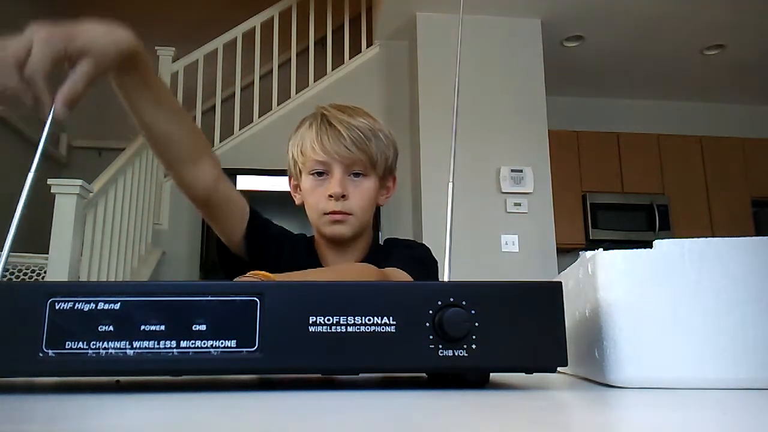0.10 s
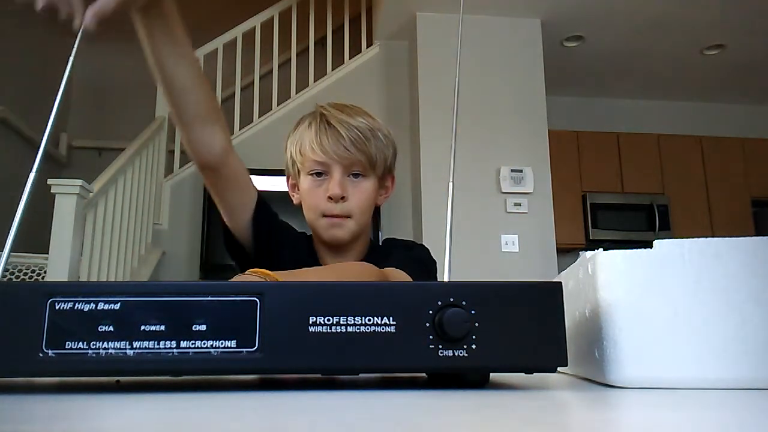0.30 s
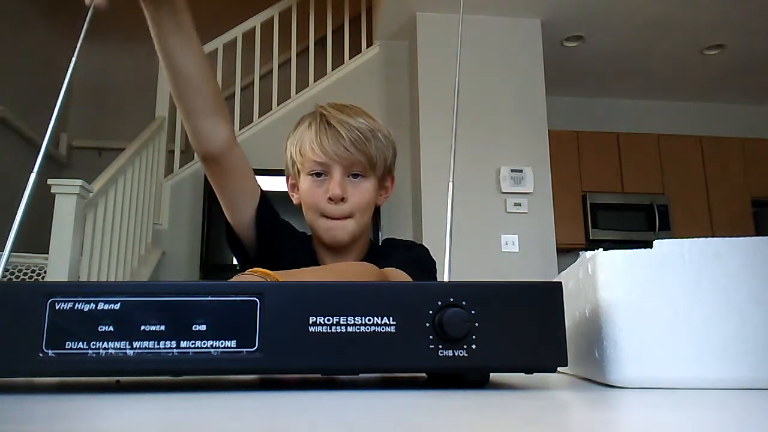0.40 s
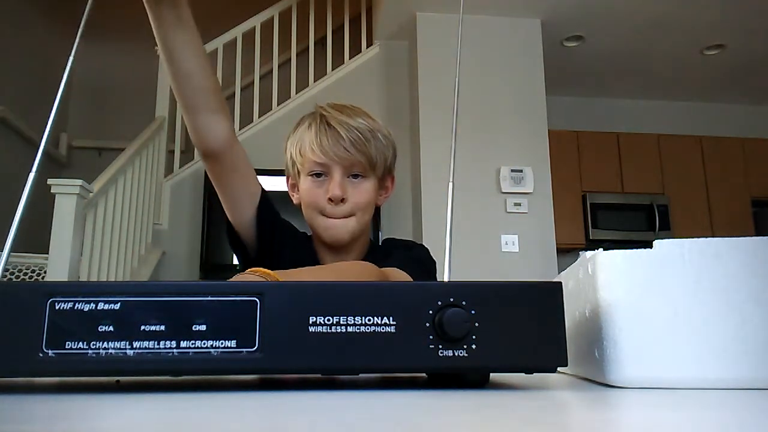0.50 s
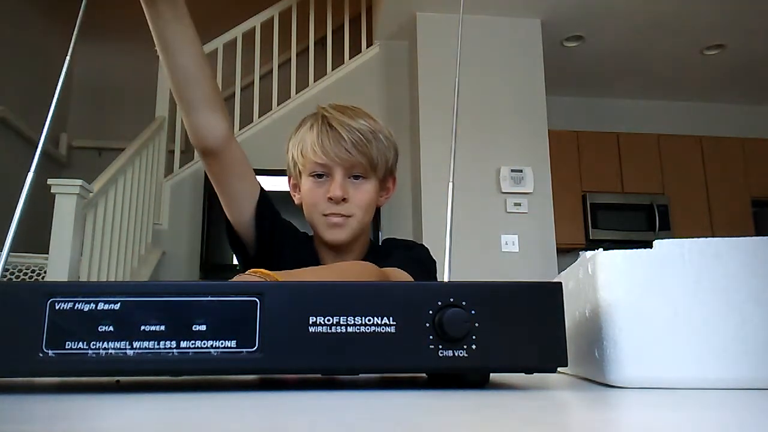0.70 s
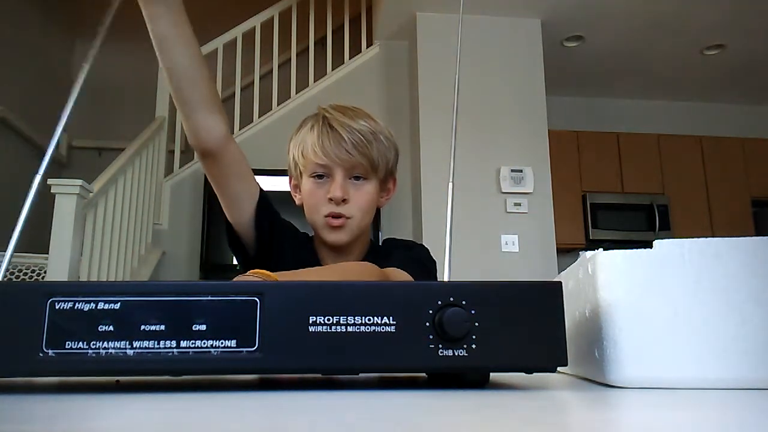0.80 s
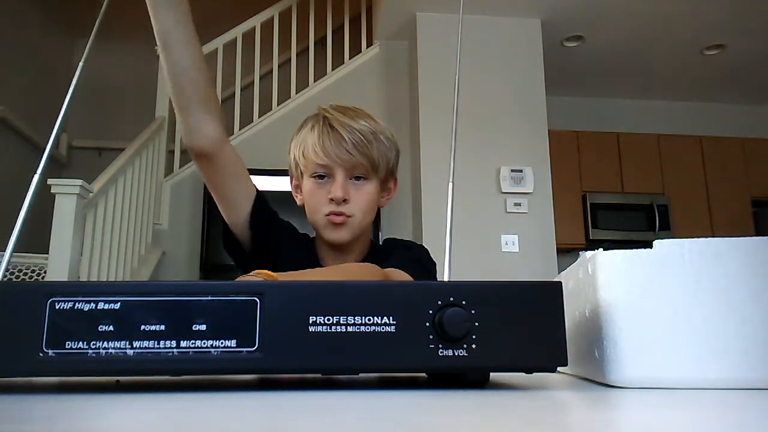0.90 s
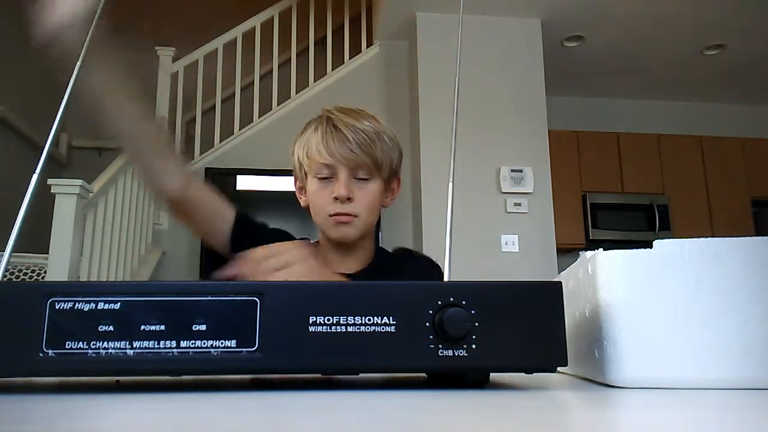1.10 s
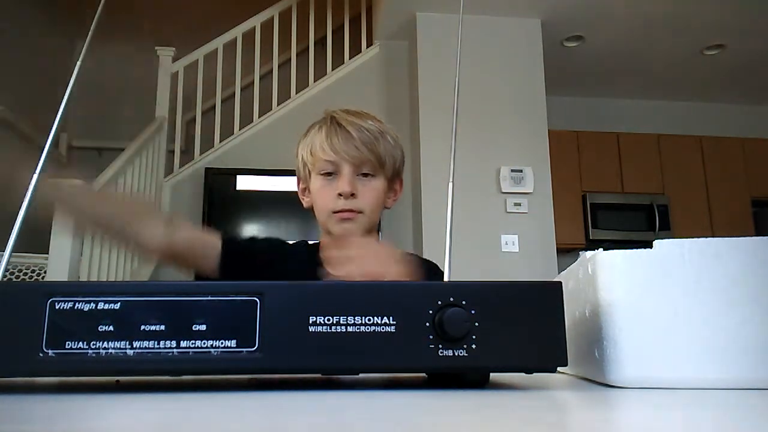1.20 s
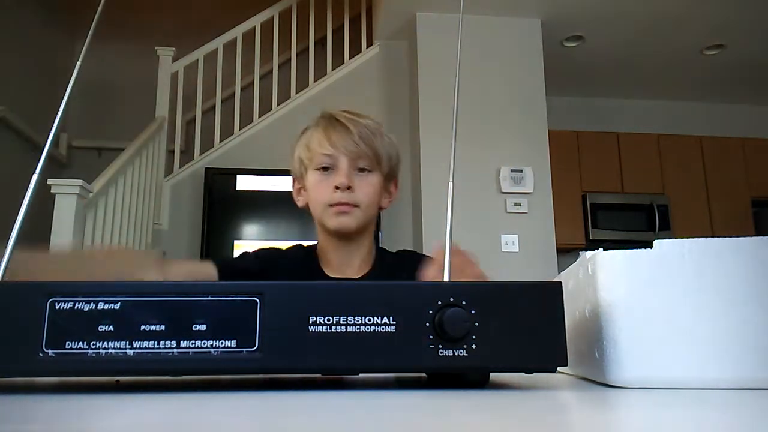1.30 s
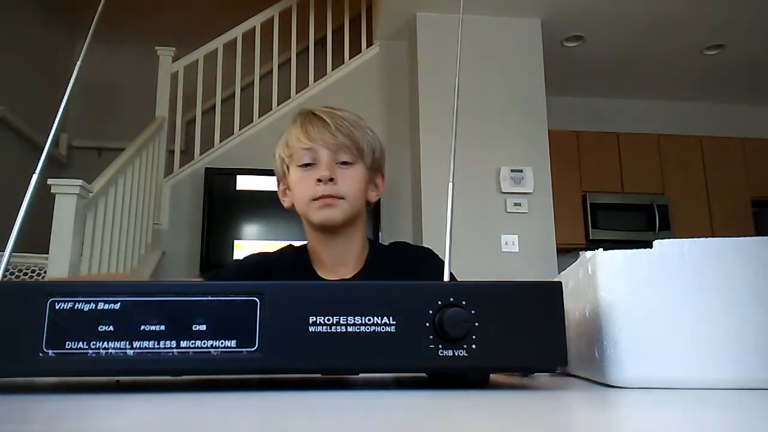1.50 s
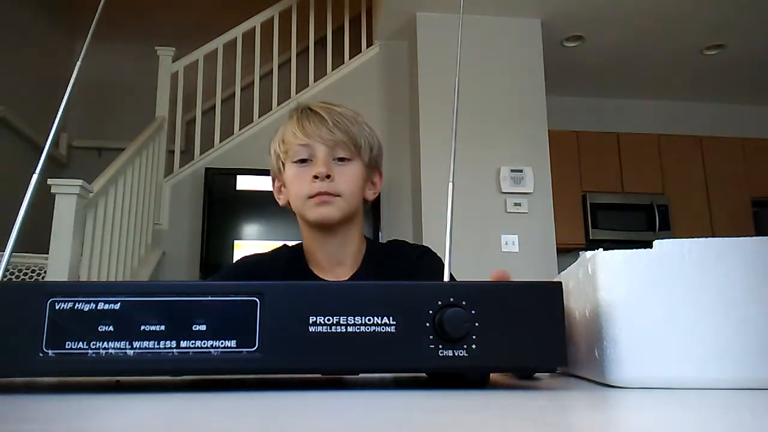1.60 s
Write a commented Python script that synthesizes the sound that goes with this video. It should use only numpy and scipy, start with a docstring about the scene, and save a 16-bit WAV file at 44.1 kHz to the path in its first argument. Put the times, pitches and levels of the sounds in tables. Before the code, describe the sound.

A telescopic metal antenna scrapes out and clacks twice, then an arm bumps a table.

```python
"""A living room, one microphone close to a table: a small receiver's telescopic antenna is pulled out.
Two sections slide in turn; their friction scrapes, whistles and shakes the case, and each hits its
stop with a clack. The arm then drops on the table with dull bumps, and the hands brush along the
table and the box. A short room echo and a quiet noise floor lie behind."""
import sys
import numpy as np
from scipy import signal
from scipy.fft import rfft, irfft, next_fast_len
from scipy.io import wavfile

SR = 44100
rng = np.random.default_rng(int(sys.argv[2]) if len(sys.argv) > 2 else 0)


def wrap_up_sound(samples):
    """Save the sound to the file named by the first command line argument, as 16-bit audio."""
    columns = np.atleast_2d(samples).T
    # keep every value between -1 and 1, then stretch to whole-number steps
    tamed = np.clip(columns, -1, 1)
    steps = np.round(tamed * 32767).astype(np.int16)
    wavfile.write(sys.argv[1], SR, steps)


N = 74970
T = np.arange(N) / SR
FFT_SIZE = 2 * next_fast_len(N)
HZ = np.maximum(np.fft.rfftfreq(FFT_SIZE, 1 / SR), 1)

# Course of the pull: t/s, level/dB
DRAG_LEVEL = [(0, -42), (.02, -47.5), (.03, -41.5), (.085, -46.5), (.2, -46.5), (.33, -43), (.45, -45.5),
              (.52, -46), (.72, -47.5), (.8, -43.5), (.83, -49.5), (.93, -55.5), (1.0, -75)]   # shaking of the case
SCRAPE_LEVEL = [(0, -70), (.04, -71), (.11, -58.5), (.143, -50.5), (.16, -49), (.2, -46.5), (.218, -50),
                (.232, -46), (.25, -45), (.325, -42.5), (.36, -56), (.42, -53), (.47, -60), (.51, -83),
                (.72, -82), (.8, -52)]   # mainly the first, tight section
HISS_LEVEL = [(.1, -100), (.3, -54), (.4, -53), (.51, -59), (.62, -60), (.72, -60), (.77, -57), (.803, -53)]   # the second, looser section
WHISTLE_LEVEL = [(.1, -104), (.15, -58.5), (.42, -53), (.52, -61), (.6, -59), (.73, -59), (.765, -54.5),
                 (.803, -48)]   # the tube, swelling into the last stop
# Spectra of the sounds: f/Hz, level/dB
LEAN_COLOUR = [(15, -38), (30, -16), (48, 5), (65, -2), (95, -15), (200, -51), (600, -56.5)]
CASE_COLOUR = [(120, -16.5), (185, -10), (240, -17.5), (310, 6.5), (370, -19), (470, -18), (740, -7),
               (950, 2.5), (1280, -3.5), (1480, -22), (1900, -19), (3000, -19), (5000, -51)]
SCRAPE_COLOUR = [(800, -29), (1500, -16), (1700, -3), (2950, -4), (3330, -7), (3680, -2), (4050, -0.5),
                 (4220, -3.5), (4420, -1), (4800, -5), (5050, -3.5), (5500, -11.5), (5950, -2), (6280, -16),
                 (6900, 0), (7150, -11), (7350, -5.5), (8550, -10.5), (8950, -5.5), (9400, -15),
                 (12300, -21.5), (15500, -29)]
HISS_COLOUR = [(900, -5), (1700, -35), (2750, -18), (3900, -15), (4400, -8), (4850, 1), (5250, -38),
               (5650, -6), (6200, -3), (6500, -1), (7000, 1.5), (7180, -1), (7500, -5.5), (9000, -8),
               (10000, -10), (15500, -25)]
CLACK_COLOUR = [(40, -48), (200, -15.5), (700, -6.5), (1250, 0.5), (1500, -10.5), (1900, -3), (3200, -6),
                (4000, -2.5), (4220, -6.5), (4700, -8), (5250, -12.5), (5800, -7.5), (6100, -10.5),
                (6450, 3), (7400, -5), (8400, -18), (9000, -14.5), (10500, -34), (15500, -33)]
THUD_COLOUR = [(100, -14), (220, -4.5), (330, 4), (500, 4.5), (660, 3.5), (780, -5), (1100, 0), (1350, 1.5),
               (1550, -13.5), (4000, -32)]
RUB_COLOUR = [(100, -11), (200, -6), (370, -10.5), (620, -7), (800, -17), (1050, -15.5), (1500, -25),
              (6000, -36)]
SWISH_COLOUR = [(800, -13), (2400, -11), (2950, 3), (3250, -5), (3520, 1), (3850, -7), (4500, -2),
                (5000, -9), (7000, -4), (10500, -11.5), (15500, -16.5)]
BRUSH_COLOUR = [(150, 5), (500, -7), (1300, -4.5), (1850, -9), (2150, -4), (2500, -11.5), (2900, -9),
                (3800, -4), (5500, -9.5), (8200, -5.5), (9200, -13), (15500, -25)]
FLOOR_COLOUR = [(25, 5.5), (60, 0.5), (130, -3), (300, -13.5), (700, -14.5), (1400, -22), (5000, -27),
                (15500, -31)]
ROOM_COLOUR = [(100, -3), (400, -7.5), (1100, -10.5), (2000, -11.5), (7000, -12), (15000, 0)]   # echo against direct sound
MIC_COLOUR = [(20, -17.5), (45, 0), (1700, -0.5)]   # the microphone's bass cut
# Resonances: f/Hz, level/dB, t60/s
CASE_MODES = [(175, -10, 0.16), (208, -6.5, 0.22), (256, -11, 0.13), (317.6, 5.5, 0.2), (408.5, -7, 0.2),
              (443.5, -3.5, 0.13), (493, -2, 0.085), (637, -1, 0.16), (830, -3.5, 0.2), (913, 3.5, 0.11),
              (1070, -3.5, 0.24), (1197, 0.5, 0.06), (1342, -7, 0.12)]
TABLE_MODES = [(52, -8, 0.13), (74.2, -0.5, 0.29), (115.2, -1.5, 0.19), (129.6, -1, 0.059),
               (179.6, -2, 0.062), (235, -3, 0.1), (322, -4, 0.16), (543, 6, 0.043)]
TUBE_MODES = [(4300, -2.5, 0.029), (6535, 1, 0.025), (7040, -6, 0.016)]
BOX_SIDE_MODES = [(276, -59, 0.035), (488, -42, 0.11), (1090, -46, 0.019)]
# Strokes of arm and hand: t/s, length/s, level/dB
LEANS = [(-.02, 0.06, -43), (.08, 0.05, -50), (.83, 0.062, -42)]
RUBS = [(.85, 0.086, -49.5), (1.012, 0.1, -55.5), (1.245, .04, -64), (1.46, 0.059, -67.5),
        (1.55, 0.051, -61.5)]
BRUSHES = [(1.59, 0.066, -45.5), (1.645, 0.064, -48)]
# Tube catches on tube: t/s, level/dB
CATCHES = [(.227, -16), (.3622, -14), (0.42, -16), (0.55, -24.5), (.663, -31)]
# The rod rings: t/s, f/Hz, level/dB, t60/s
PINGS = [(0.2297, 2920, -38.5, 0.052), (.2295, 3690, -47, 0.087), (.3495, 6470, -30.5, .05),
         (.353, 3975, -32, 0.035), (.808, 990, -35, 0.14)]
# The tubes squeak: t/s, length/s, level/dB, first f/Hz, last f/Hz, roughness width/Hz
SQUEAKS = [(0.301, 0.045, -45, 3760, 3640, 70), (0.455, 0.038, -49, 6060, 6070, 352),
           (0.575, 0.14, -59, 3070, 2674, 70), (0.603, 0.11, -60.5, 4470, 4390, 45),
           (0.67, 0.027, -56, 3470, 3380, 50), (0.745, 0.061, -64, 4620, 4750, 200)]
# A section hits its stop or bounces on it:
# t/s, metal level/dB, tilt/(dB per octave), chatter/s, shudder level/dB, case level/dB, cut-off f/Hz
STOPS = [(0.35, 10.5, 0.5, 0.0036, 10, -34.5, 2500), (.807, 6.5, -3.5, 0.0064, 3, -38, 545),
         (0.8183, -3.5, -6.5, 0.0025, -1, -61, 704)]
# Arm and hands land on the table: t/s, level/dB, cut-off f/Hz
BUMPS = [(0.363, -47, 122), (0.61, -53, 90), (.85, -54, 110), (0.874, -34, 250), (.881, -37, 430),
         (.913, -40, 169), (1.024, -48, 400), (1.068, -48.5, 595), (1.089, -48.5, 118), (1.283, -65, 100),
         (1.469, -46.5, 155), (1.647, -60, 200), (1.66, -49, 700)]
# Skin skims the table: peak t/s, half width/s, level/dB
SWISHES = [(1.138, 0.017, -58), (1.16, 0.08, -68), (1.541, 0.049, -66.5)]
# Decay of the room: f/Hz, t60/s
ROOM_T60 = [(150, 0.48), (1000, 0.49), (6500, 0.19), (12000, 0.97)]


def from_db(db):
    """Decibels to gain."""
    return 10 ** (np.asarray(db) / 20)


def rms_one(x):
    """Scale to unit rms."""
    return x / np.sqrt(np.mean(x ** 2) + 1e-20)


def level(rows):
    """Gain over time from t/s, level/dB points; silent after the last."""
    return from_db(np.interp(T, *np.transpose(rows), right=-200))


def at_hz(points, hz):
    """Read a table on a log-frequency axis."""
    f, value = np.transpose(points)
    return np.interp(np.log(hz), np.log(f), value)


def colour(x, points, tilt_db=0):
    """Minimum-phase filter with the given spectrum, tilted per octave about 1 kHz."""
    db = at_hz(points, HZ) + tilt_db * np.log2(HZ / 1000)
    cepstrum = irfft(np.log(from_db(db)))
    cepstrum[1:FFT_SIZE // 2] *= 2
    cepstrum[FFT_SIZE // 2 + 1:] = 0
    return irfft(rfft(x, FFT_SIZE) * np.exp(rfft(cepstrum)))[:N]


def soften(x, cut_hz):
    """Low-pass, as a softer contact does."""
    return signal.sosfilt(signal.butter(2, cut_hz, fs=SR, output="sos"), x + 1e-18)


def ring(x, modes):
    """Drive decaying modes of alternating polarity."""
    out = 0
    for k, (hz, db, t60) in enumerate(modes):
        radius = np.exp(-np.log(1000) / (t60 * SR))
        feedback = [1, -2 * radius * np.cos(2 * np.pi * hz / SR), radius ** 2]
        out += (-1) ** k * from_db(db) * signal.lfilter([.5, 0, -.5], feedback, x + 1e-18)
    return out


def dying(start, decay_s):
    """Sudden start and exponential decay."""
    return (T >= start) * np.exp(-np.maximum(T - start, 0) / decay_s)


def swell(start, length, edge_share=0.28):
    """Rise, hold and fade."""
    return np.clip(np.minimum(T - start, start + length - T) / (edge_share * length), 0, 1)


def wander(per_s):
    """A random value that drifts to a new one so many times a second."""
    return np.interp(T * per_s, np.arange(N), rng.standard_normal(N))


def kick(start, db=0):
    """A single impulse."""
    push = np.zeros(N)
    push[int(start * SR)] = from_db(db)
    return push


def burst(envelope):
    """A flurry of contacts with a total energy of one."""
    return rng.choice([-1, 1], N) * envelope / np.sqrt(np.sum(envelope ** 2) + 1e-20)


def slips(per_s=9000, spread_db=3.0):
    """Friction: a dense random run of tiny slips of uneven size."""
    sizes = from_db(spread_db * np.minimum(rng.exponential(1, N), 5))
    return sizes * rng.choice([-1, 1], N) * (rng.random(N) < per_s / SR)


def uneven_friction(points, patchy_db):
    """The contact wanders, so each half octave of the friction swells and sinks on its own."""
    spectrum = rfft(colour(slips(), points), FFT_SIZE)
    out = 0
    for octave in np.arange(9, 15, .5):
        weight = np.clip(1 - 2 * np.abs(np.log2(HZ) - octave), 0, 1)
        out += irfft(spectrum * weight)[:N] * from_db(patchy_db * wander(per_s=55))
    return rms_one(out)


def strokes(rows, points):
    """Soft friction strokes of one colour."""
    gain = sum(from_db(db) * swell(start, length) for start, length, db in rows)
    return gain * rms_one(colour(slips(), points))


def leans():
    """The box rocks and the arm leans: brief, deep rumbles."""
    return strokes(LEANS, LEAN_COLOUR)


def case_shake(grip_db=2.4):
    """The drag shakes case and table; the shifting grip makes each case mode waver."""
    modes = sum(ring(slips(), [mode]) * from_db(grip_db * wander(per_s=35)) for mode in CASE_MODES)
    case_ring = from_db(-4) * rms_one(modes)
    case_noise = from_db(-4.5) * rms_one(colour(slips(), CASE_COLOUR))
    table_rumble = from_db(-20.5) * rms_one(ring(slips(), TABLE_MODES))
    return level(DRAG_LEVEL) * (case_noise + case_ring + table_rumble)


def sliding():
    """Tube slips inside tube: a scrape when tight, a hiss when loose, a thin resonant whistle."""
    scrape = level(SCRAPE_LEVEL) * uneven_friction(SCRAPE_COLOUR, patchy_db=4.0)
    hiss = level(HISS_LEVEL) * uneven_friction(HISS_COLOUR, patchy_db=5.5)
    whistle = level(WHISTLE_LEVEL) * rms_one(ring(colour(slips(), HISS_COLOUR), TUBE_MODES))
    return scrape + hiss + whistle


def catches():
    """Short bright ticks of tube against tube."""
    ticks = sum(from_db(db) * burst(dying(start, decay_s=0.0048)) for start, db in CATCHES)
    return colour(ticks, SCRAPE_COLOUR, tilt_db=3.0)


def pings():
    """The rod rings when it catches or stops, at pitches that depend on its length."""
    return sum(ring(kick(start), [mode]) for start, *mode in PINGS)


def squeaks():
    """Faint rough squeaks; most sink as the tube gets longer."""
    out = 0
    for start, length, db, from_hz, to_hz, width_hz in SQUEAKS:
        pitch = np.interp(T, [start, start + length], [from_hz, to_hz])
        tone = np.sin(2 * np.pi * np.cumsum(pitch) / SR)
        flutter = rms_one(soften(rng.standard_normal(N), width_hz))
        out += from_db(db) * swell(start, length) * flutter * tone
    return out


def stops():
    """Metal chatters on the stop, with a duller tail; the case shudders and rings on."""
    out = 0
    for start, metal_db, tilt_db, chatter_s, shudder_db, case_db, cut_hz in STOPS:
        chatter = burst((T >= start) * np.exp(-((T - start) / chatter_s) ** 2))
        tail = from_db(-8) * soften(burst(dying(start, decay_s=0.01)), cut_hz=5000)
        clack = from_db(metal_db) * colour(chatter + tail, CLACK_COLOUR, tilt_db)
        shudder = from_db(shudder_db) * colour(burst(dying(start, decay_s=0.014)), THUD_COLOUR)
        case_ring = ring(soften(kick(start, case_db), cut_hz), CASE_MODES)
        out += clack + shudder + case_ring
    return out


def bumps():
    """Arm and hands land softly: a dull puff of contact, and the table's low modes ring."""
    pushes = sum(soften(kick(start, db), cut_hz) for start, db, cut_hz in BUMPS)
    puff = from_db(34.5) * colour(pushes, THUD_COLOUR)
    return puff + ring(pushes, TABLE_MODES)


def rubs():
    """The forearm rubs dully on the table."""
    return strokes(RUBS, RUB_COLOUR)


def swishes():
    """Skin slides lightly over the table, swelling and fading smoothly."""
    gain = sum(from_db(db) * np.exp(-.5 * ((T - peak) / width) ** 2) for peak, width, db in SWISHES)
    return gain * uneven_friction(SWISH_COLOUR, patchy_db=2.5)


def hand_on_box():
    """A hand brushes along the box and knocks its side."""
    return strokes(BRUSHES, BRUSH_COLOUR) + ring(kick(start=1.598), BOX_SIDE_MODES)


def room(x, delay_s=0.00492):
    """Diffuse living-room echo; each band dies at its own rate."""
    edges_hz = np.geomspace(60, 16000, 9)
    tail = 0
    for low, high in zip(edges_hz, edges_hz[1:]):
        t60 = at_hz(ROOM_T60, np.sqrt(low * high))
        fade = dying(delay_s, t60 / np.log(1000))
        band_pass = signal.butter(2, [low, high], "band", fs=SR, output="sos")
        band = signal.sosfilt(band_pass, rng.standard_normal(N))
        tail += band * fade / np.sqrt(np.sum(fade ** 2))
    return colour(signal.fftconvolve(x, tail)[:N], ROOM_COLOUR)


def scene():
    """Antenna, arm and hands up close; the room and its noise floor behind."""
    slide = case_shake() + sliding() + squeaks()
    impacts = catches() + pings() + stops() + bumps()
    handling = leans() + impacts + rubs() + swishes() + hand_on_box()
    # The sliding reaches the table mostly through the case, so it is drier.
    echo = room(handling + from_db(-5.5) * slide)
    floor = from_db(-60) * rms_one(colour(rng.standard_normal(N), FLOOR_COLOUR))
    return (slide + handling + echo + floor)[None]


def record(dry):
    """One microphone thins the deep bass; the top is cut steeply at 15.8 kHz."""
    top_cut = signal.ellip(10, .2, 70, 15800, fs=SR, output="sos")
    return signal.sosfilt(top_cut, colour(dry[0], MIC_COLOUR)[None])


dry = scene()
out = record(dry)
wrap_up_sound(out)
```